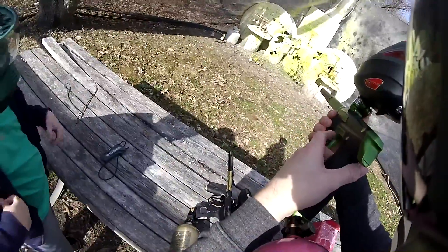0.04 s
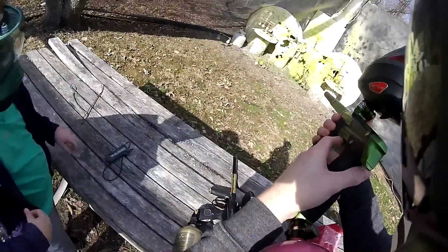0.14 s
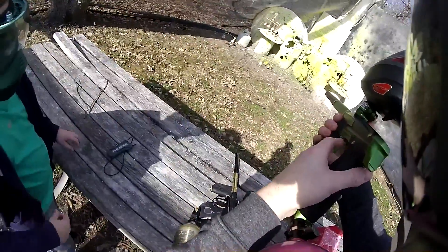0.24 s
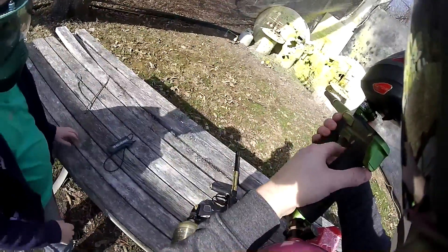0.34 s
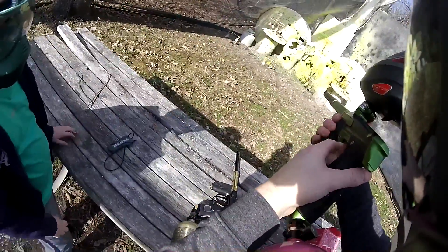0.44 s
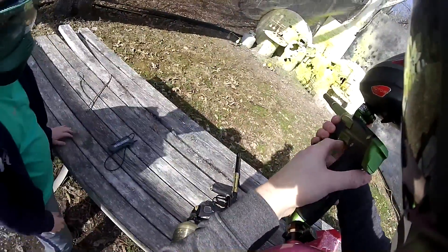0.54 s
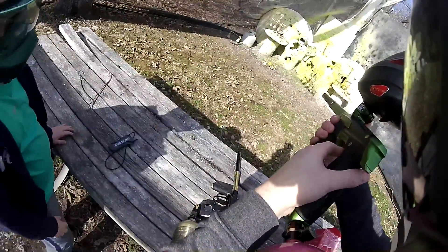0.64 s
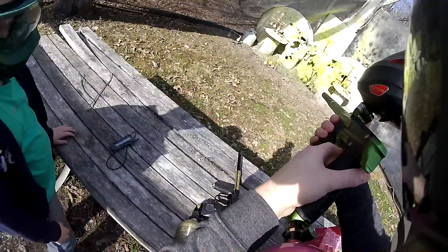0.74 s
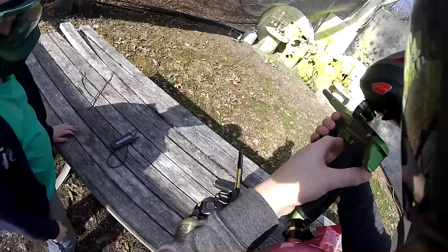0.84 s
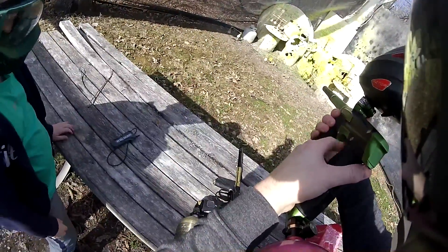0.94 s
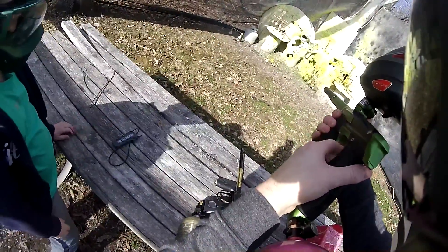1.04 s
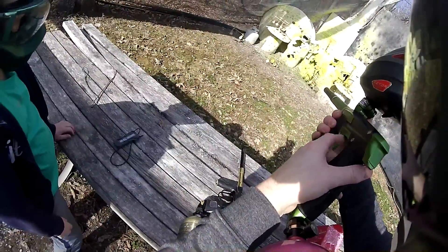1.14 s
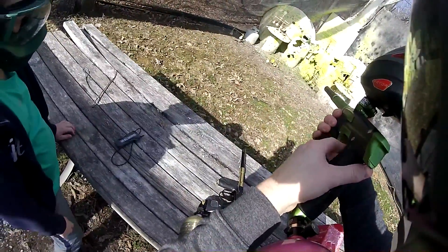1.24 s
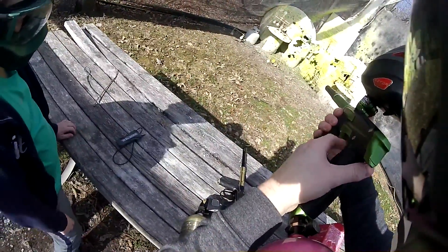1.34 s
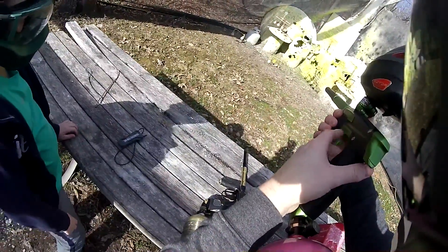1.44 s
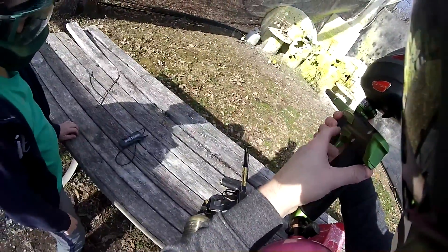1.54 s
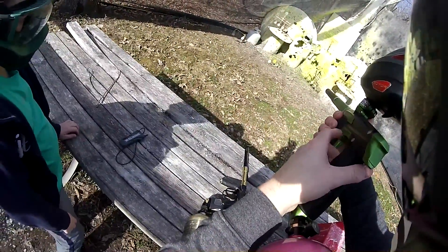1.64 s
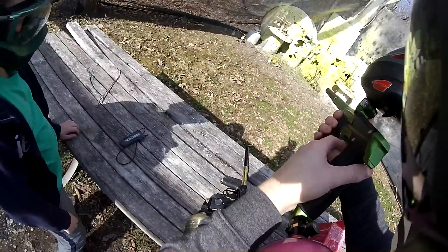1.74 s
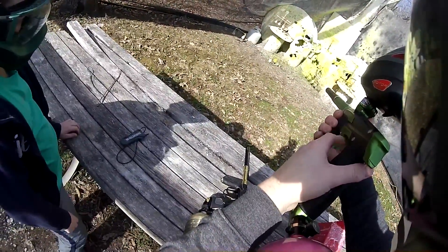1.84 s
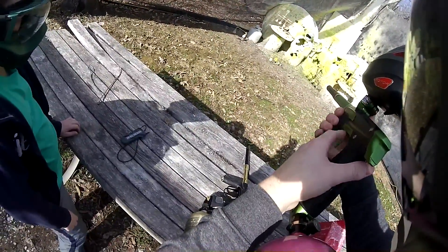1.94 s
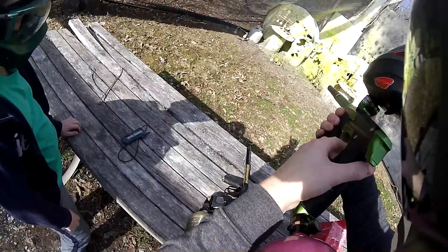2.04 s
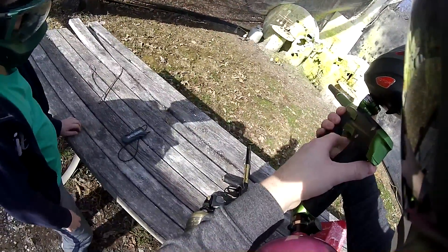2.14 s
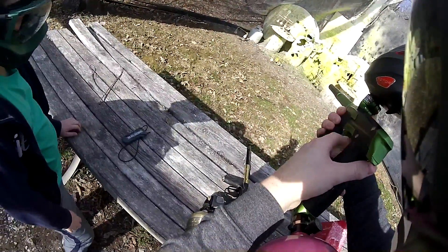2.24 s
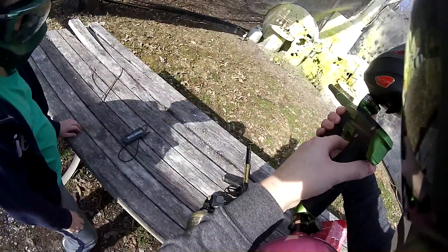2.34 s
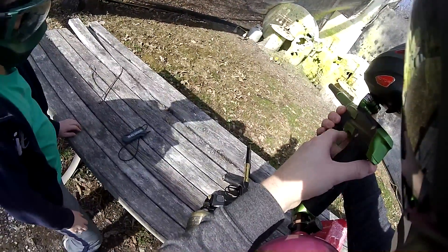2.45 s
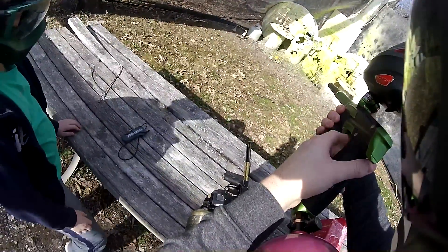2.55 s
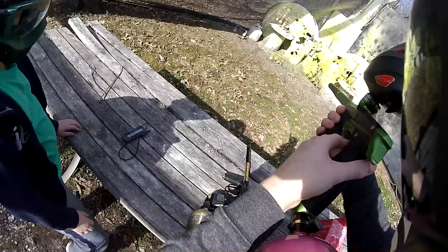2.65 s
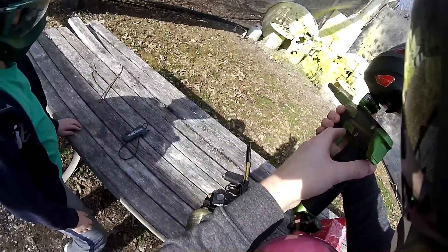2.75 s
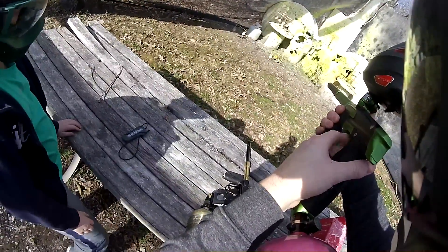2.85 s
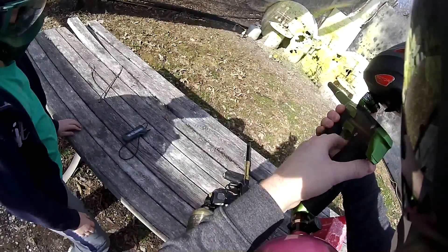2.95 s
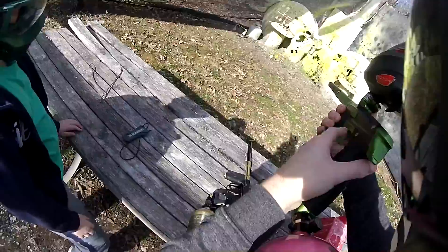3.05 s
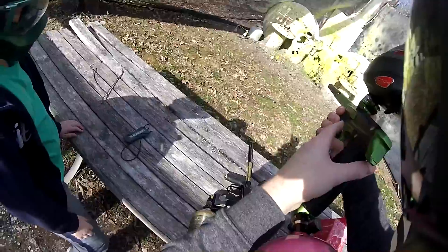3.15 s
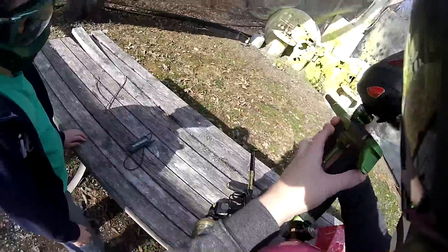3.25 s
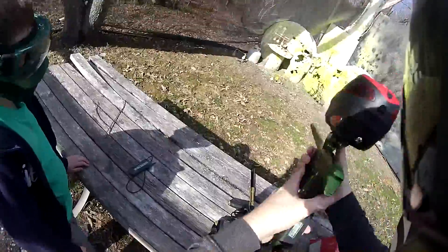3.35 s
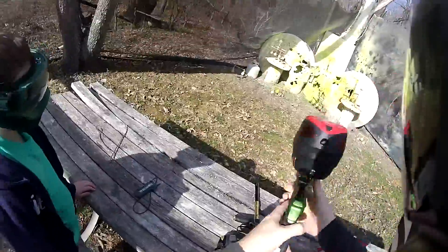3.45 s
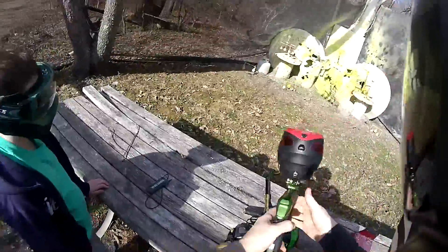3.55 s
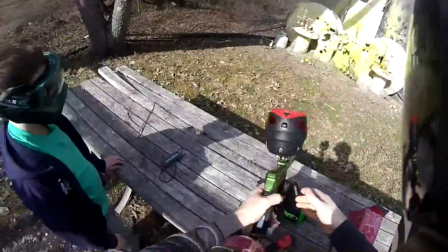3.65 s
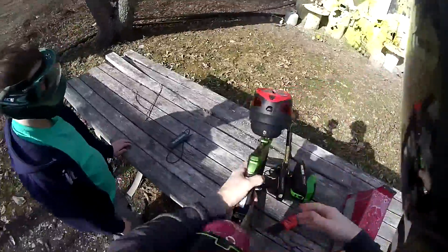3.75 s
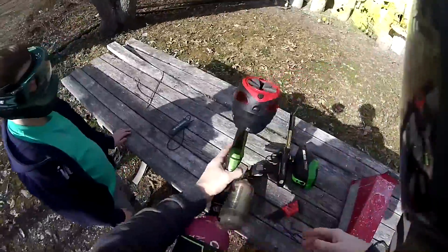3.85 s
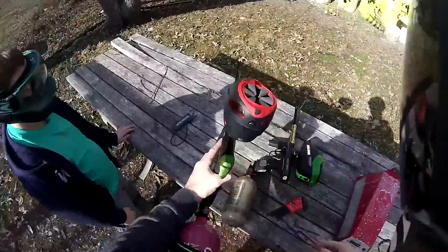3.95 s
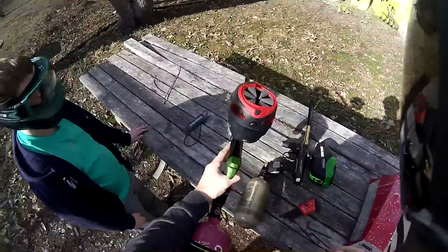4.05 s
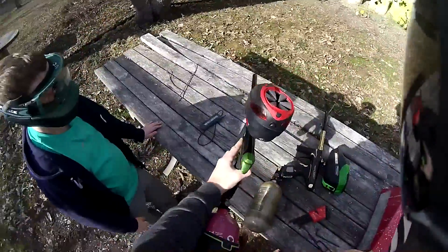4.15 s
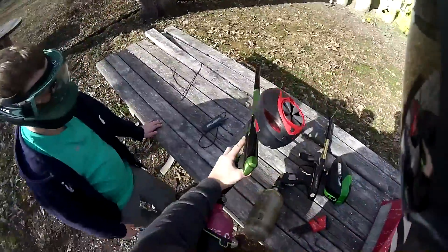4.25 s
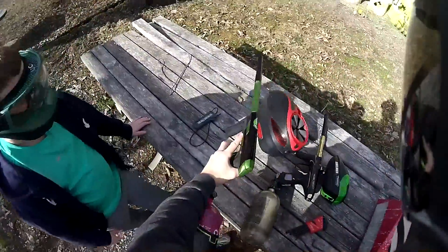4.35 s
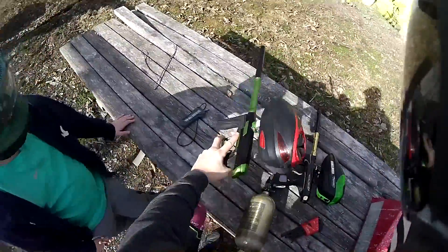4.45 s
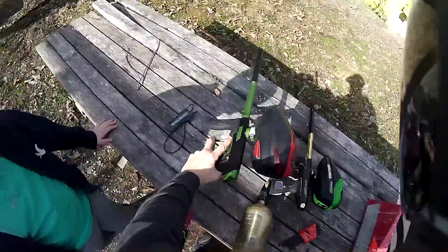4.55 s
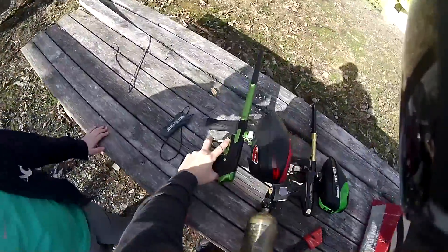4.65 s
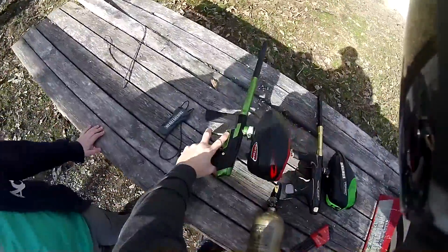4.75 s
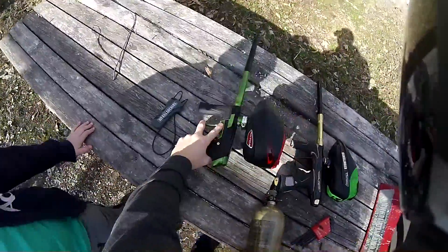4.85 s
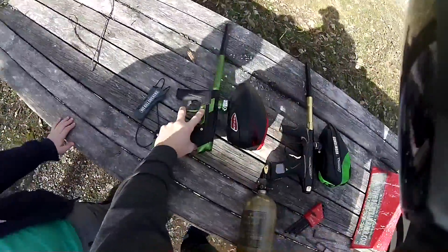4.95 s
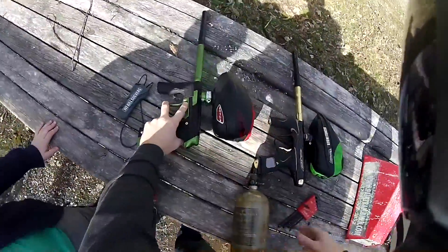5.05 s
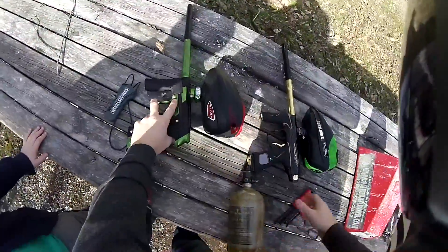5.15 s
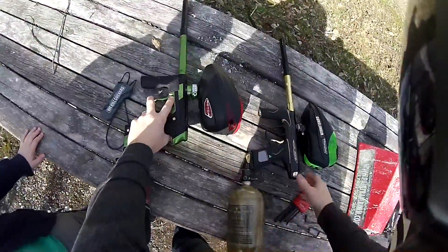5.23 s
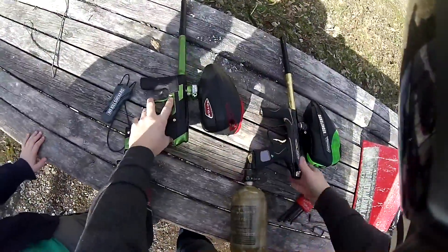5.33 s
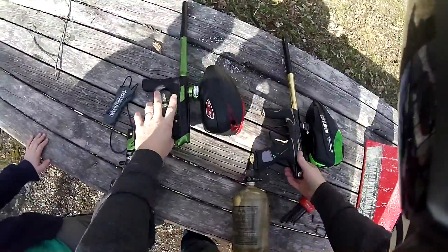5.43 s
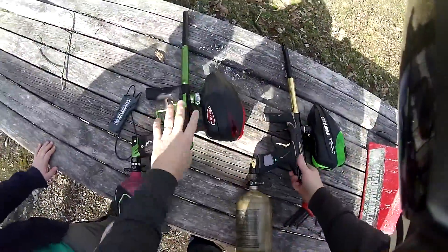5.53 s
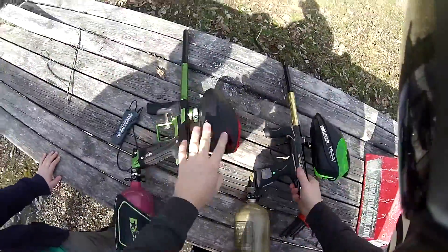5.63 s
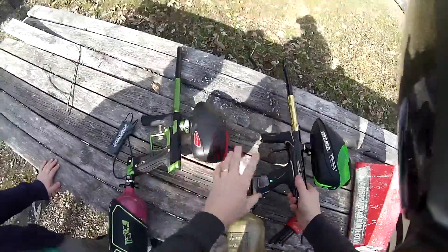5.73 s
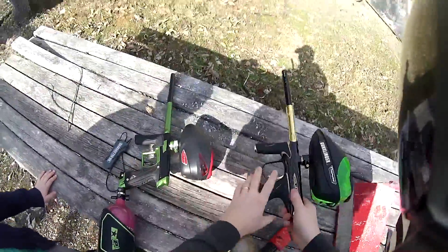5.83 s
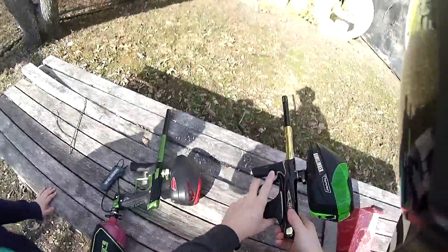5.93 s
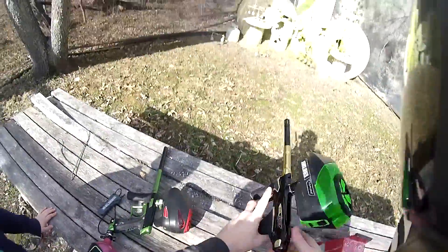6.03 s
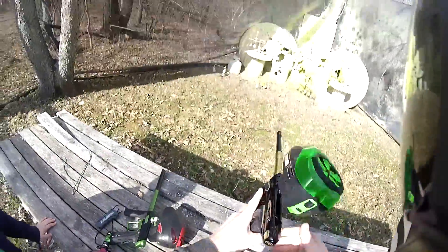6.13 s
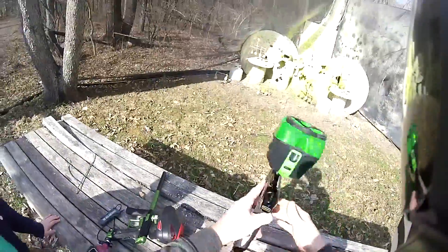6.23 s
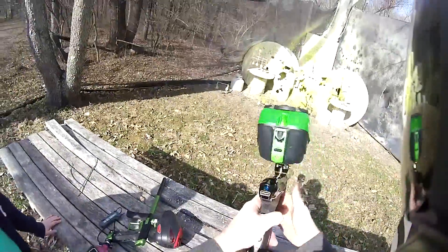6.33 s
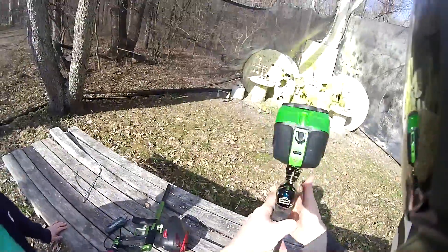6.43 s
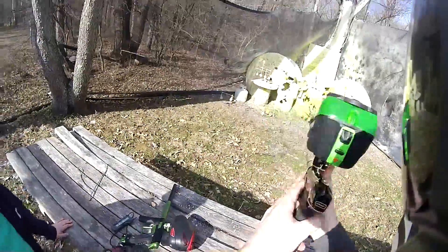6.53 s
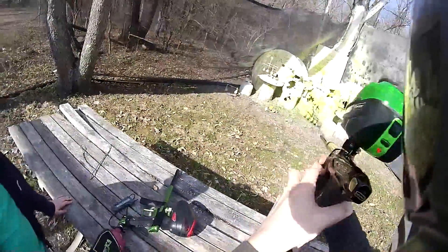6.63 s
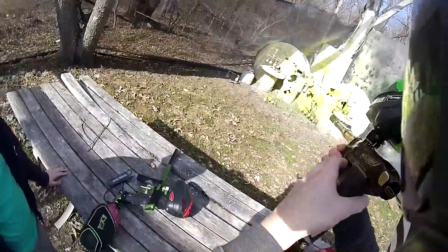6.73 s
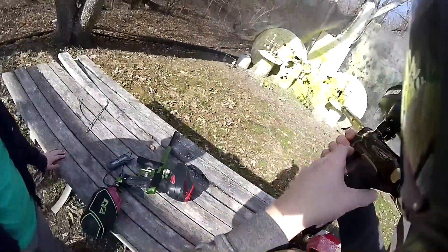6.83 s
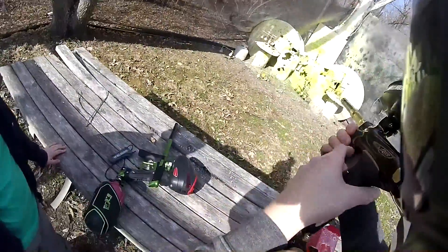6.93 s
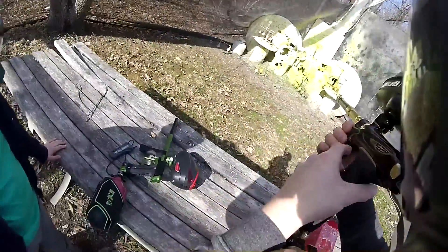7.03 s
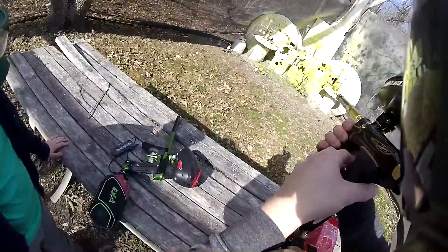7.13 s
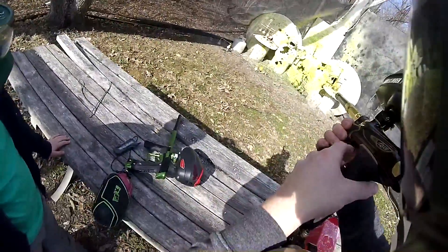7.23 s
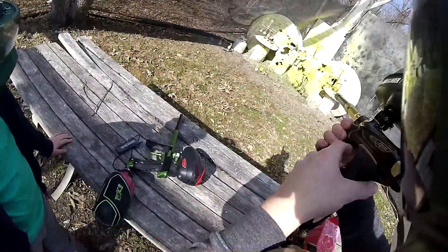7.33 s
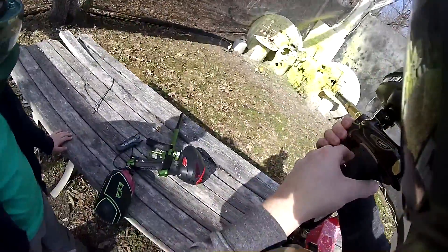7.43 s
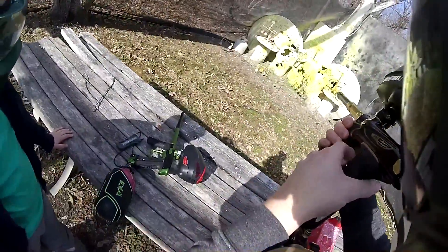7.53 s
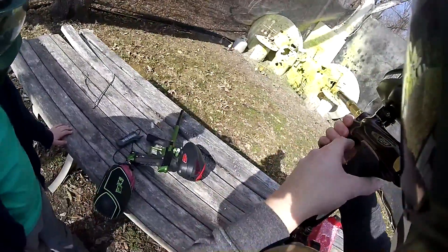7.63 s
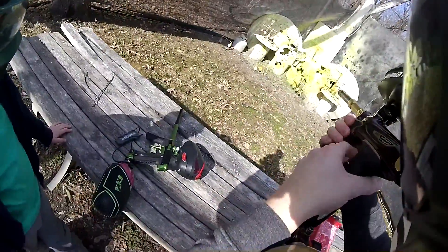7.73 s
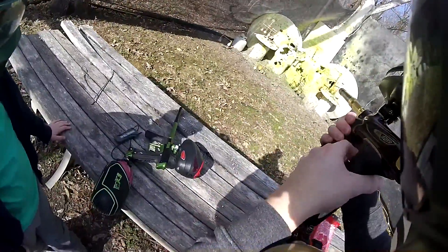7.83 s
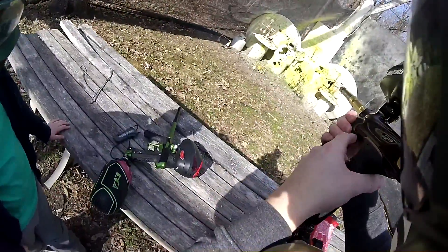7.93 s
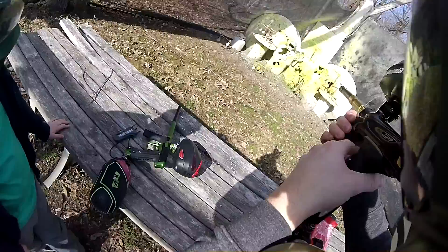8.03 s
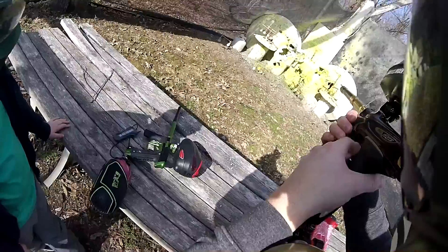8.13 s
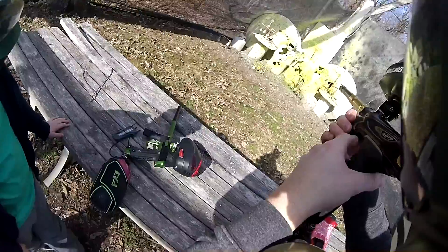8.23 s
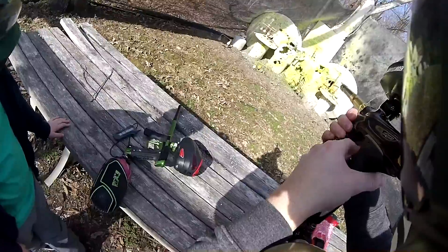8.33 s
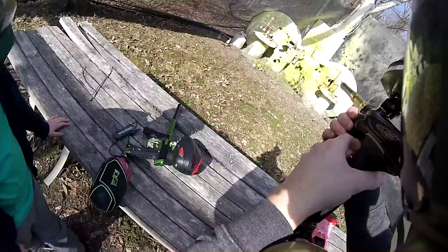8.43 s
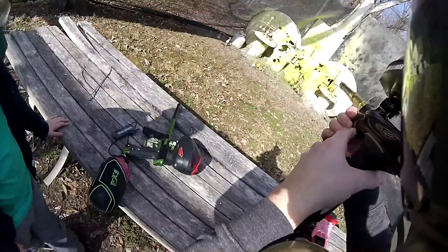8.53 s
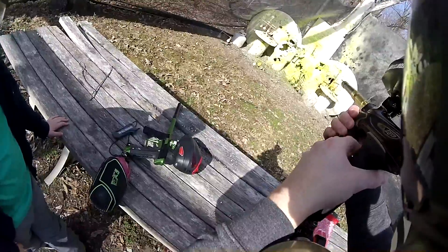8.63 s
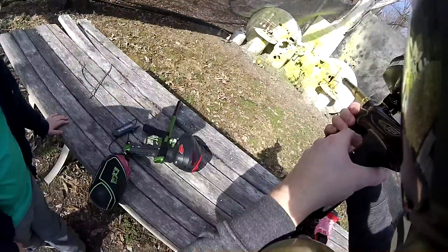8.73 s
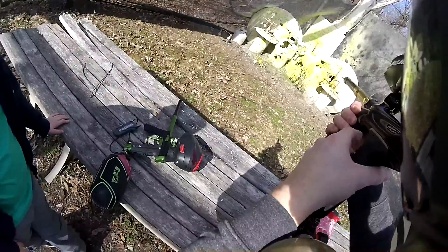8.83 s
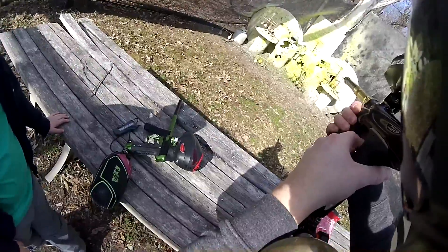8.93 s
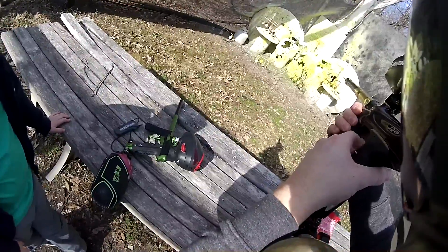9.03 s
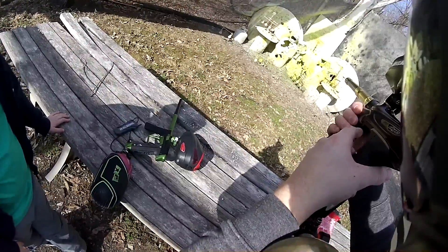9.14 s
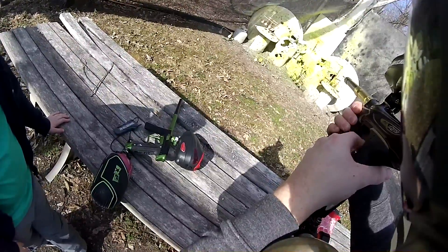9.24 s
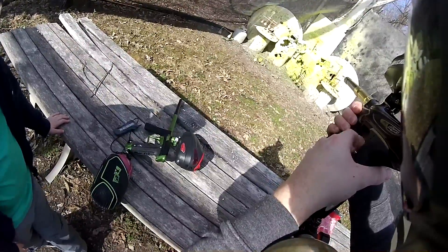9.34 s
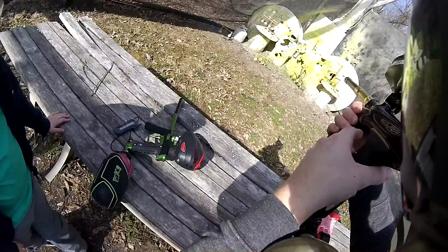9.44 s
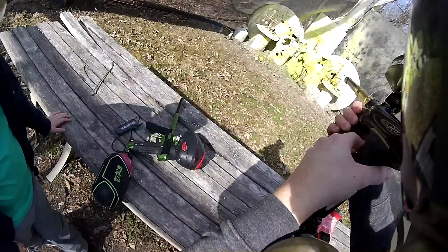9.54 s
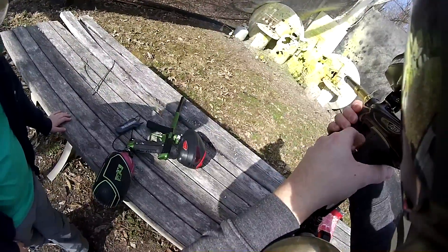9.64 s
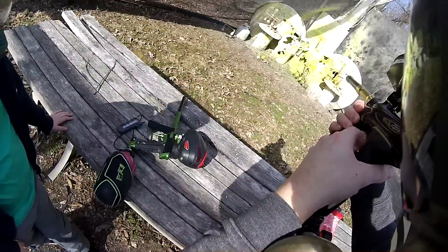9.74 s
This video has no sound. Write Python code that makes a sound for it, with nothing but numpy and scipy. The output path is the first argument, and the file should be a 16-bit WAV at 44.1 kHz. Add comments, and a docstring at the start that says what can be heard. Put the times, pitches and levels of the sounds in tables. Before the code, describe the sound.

An electronic paintball marker fires close by, soft deep pops in single shots and rapid bursts, each ball smacking a target just after. It stops, fingers tap plastic, and the marker knocks down onto a wooden table. A sleeve swishes, then a second marker fires with a hollow bark, its hits fainter. A head-worn microphone catches a quiet outdoor hush and a short echo from the trees.

```python
"""A plank table at the edge of a wood, heard from a head-worn camera that ticks faintly in the outdoor hush.
An electronic paintball marker fires singly and at twelve shots a second: solenoid click, bolt sliding
forward, air blast, bolt return. Downrange, each ball hits the targets about 70 ms later.
From 4 s fingers tap plastic, the marker is laid on the planks and another comes up with a swish of sleeve.
From 7 s that one fires, its balls landing 80-120 ms later. Ground and trees throw back shots and knocks."""
import sys
import numpy as np
from scipy import signal
from scipy.fft import rfft, irfft
from scipy.io import wavfile

SR = 44100
rng = np.random.default_rng(int(sys.argv[2]) if len(sys.argv) > 2 else 0)


def dump_mix(stems):
    """Bounce the given channels to the path in sys.argv[1] as a 16-bit WAV at rate SR."""
    frames = np.atleast_2d(stems).T  # one column per channel
    limited = np.clip(frames, -1, 1)  # hard clip at full scale
    pcm = np.round(limited * 32767).astype(np.int16)
    wavfile.write(sys.argv[1], SR, pcm)


N = 431298
T = np.arange(SR // 3) / SR  # time within one short sound
FIRST_CYCLE_S, SECOND_CYCLE_S = .0817, .08  # between shots at full rate

# first marker's bursts, each aimed at one spot: t/s, shots, flight/s, splat/dB, thud/dB, panel pitch ratio
FIRST_BURSTS = [(.3551, 1, 0.069, 4.5, -4, 0.99), (.4556, 1, 0.071, 5.5, 0, 1.065),
                (.6294, 1, .0696, 1.5, 1.5, 1.02), (.8688, 7, .073, -1, -20.5, 1),
                (1.917, 1, 0.069, -3, -17, 1.1), (2.0568, 10, .071, -2.5, -15, 1),
                (2.91, 2, 0.073, 1, -16, 0.91), (3.0761, 1, 0.074, -0.5, -23, 1.1)]
# second marker's bursts: t/s, shots, flight/s, splat/dB, thud/dB, muzzle crack/dB
SECOND_BURSTS = [(7.135, 1, 0.078, -3, -13.5, -1), (7.4261, 1, 0.083, 0.5, -36, 1.5),
                 (7.5715, 1, 0.083, -9.5, -18.5, 1), (7.7183, 1, 0.085, 0, -29, 4.5),
                 (7.8734, 5, 0.095, -6.5, -22, 0.7), (8.3131, 1, 0.11, -13, -32, 1.5),
                 (8.3961, 2, 0.098, -8, -34, 2.5), (8.6134, 1, 0.12, -11, -28, 3),
                 (8.701, 4, 0.12, -16, -34, 0.9), (9.0674, 1, 0.093, -7, -26, -7),
                 (9.1531, 2, .11, -10, -32, 0), (9.3163, 1, 0.11, -8, -27, -4),
                 (9.398, 5, .102, -6, -34, 1.7)]
# spectrum of a hard, sharp click: f/Hz, level/dB
CLICK = [(1500, 7.5), (3000, 5.5), (4000, -4), (5000, -10.5), (6500, -11.5), (8800, -17), (13000, -42)]
# spectrum of a sliding bolt or spraying paint: f/Hz, level/dB
RASP = [(300, 3), (1400, 13.5), (2800, -14.5), (3600, -15), (4600, -17), (6500, -23), (8800, -26),
        (13000, -81)]


def amp(db):
    """Decibels to gain."""
    return 10 ** (np.asarray(db) / 20)


def add(track, s, sound):
    """Mix a sound into a track at s seconds."""
    at = max(0, int(round(s * SR)))
    part = sound[:max(0, len(track) - at)]
    track[at:at + len(part)] += part


def cut(x, hz, kind, order):
    """Butterworth low-pass or high-pass."""
    return signal.sosfilt(signal.butter(order, hz, kind, fs=SR, output="sos"), x + 1e-18)


def noise(spectrum, size):
    """Noise of rms 1; the spectrum gives only its shape."""
    hz, db = np.transpose(spectrum)
    bin_hz = np.fft.rfftfreq(size, 1 / SR) + 1
    bass_rolloff = np.minimum(bin_hz / hz[0], 1) ** 2
    shape = bass_rolloff * amp(np.interp(np.log(bin_hz), np.log(hz), db))
    x = irfft(rfft(rng.standard_normal(size)) * shape, size)
    return x / x.std()


def fade(t60, rise):
    """A quick swell and an exponential decay, both in seconds."""
    return (1 - np.exp(-T / rise)) * np.exp(-np.log(1000) * T / t60)


def ring(modes, spread_db=.8, detune=.012, rise=.00005, alternate=False):
    """A struck body, each blow a little different; alternate starts neighbouring modes in opposition."""
    out = np.zeros(len(T))
    for k, (hz, db, t60) in enumerate(modes):
        strength, pitch = rng.standard_normal(2)
        sign = (-1) ** k if alternate else 1
        tone = np.sin(2 * np.pi * hz * (1 + detune * pitch) * T)
        out += sign * amp(db + spread_db * strength) * tone * fade(t60, rise)
    return out


def puff(spectrum, db, t60, rise):
    """A short burst of noise: escaping air, sliding or spray."""
    return amp(db) * noise(spectrum, size=len(T)) * fade(t60, rise)


def shots(bursts, cycle_s):
    """One row per shot: a burst repeats at the marker's cycle time."""
    return np.array([(start + k * cycle_s, *aim) for start, count, *aim in bursts for k in range(count)])


def camera(ticks_per_s=20.104, whine_hz=9625, whine_db=-91.5):
    """Right at the microphone, the camera's low regular ticking and thin whine."""
    # modes of the tick: f/Hz, level/dB, t60/s
    tick_modes = [(40, -67, 1), (101, -59.5, 0.21), (116, -47.5, 0.026), (367, -68, 0.17),
                  (417.5, -68, 0.45)]
    tick = ring(tick_modes, spread_db=0, detune=0)
    ticks = np.zeros(N)
    for s in np.arange(.0232, N / SR, 1 / ticks_per_s):
        add(ticks, s, -tick)
    whine = amp(whine_db) * np.sqrt(2) * np.sin(2 * np.pi * whine_hz * np.arange(N) / SR)
    return ticks + whine


def hush():
    """Steady outdoor air, far off."""
    # spectrum of the hush: f/Hz, level/dB
    air = [(88, -27), (150, -1), (171, -11), (206, -4), (253, -16.5), (335, -2.5), (495, -15), (1150, -5),
           (1490, -10.5), (1640, -10.5), (2330, -12.5), (3330, -27), (10000, -32), (13000, -33.5)]
    return amp(-60) * noise(air, size=N)


def first_marker():
    """Close by, a soft, deep pop with a whistling valve and a loud bolt return; gives (ringing, hiss)."""
    # modes of solenoid, barrel and body: f/Hz, level/dB, t60/s
    solenoid = [(970, -11, 0.007), (1046, -19.5, 0.011), (1516, -25, 0.01)]
    barrel = [(129, -31.5, 0.054), (217, -26, 0.045), (330, -21.5, 0.02), (447, -35.5, 0.014),
              (1350, -31, 0.0035)]
    body = [(250, -34.5, 0.014), (408, -26.5, 0.047), (543, -33, 0.081), (1047, -24, 0.025),
            (1190, -40.5, 0.23), (1403, -31.5, 0.032), (2175, -46.5, 0.075), (2570, -30, 0.0087)]
    # spectrum of air leaving the valve: f/Hz, level/dB
    valve = [(1500, 12.5), (3300, 0), (4500, -18), (6300, -5), (7500, -17.5), (8600, 3.5), (9600, -20),
             (13000, -30)]
    # the bolt's contacts: t/s from the blast, level/dB
    bolt_stops = [(-.005, -5), (-.0033, -7.5), (0.0199, -4.5), (0.0244, 0.5), (.0274, -6)]
    ringing, hiss = np.zeros((2, N))
    for s in shots(FIRST_BURSTS, FIRST_CYCLE_S)[:, 0]:
        blast_db, valve_db = rng.normal([.5, -24.5], .6)  # air pressure varies from shot to shot
        add(ringing, s - .0238, ring(solenoid, rise=.0017, alternate=True))
        add(hiss, s - .0052, puff(RASP, db=-23.5, t60=.034, rise=.0011))  # the bolt slides forward
        add(ringing, s, amp(blast_db) * ring(barrel))
        add(hiss, s + .00019, puff(valve, db=valve_db, t60=.012, rise=.0002))
        for delay, db in bolt_stops:
            add(ringing, s + delay + rng.normal(0, .00016), amp(db) * ring(body, alternate=True))
            add(hiss, s + delay, amp(db) * puff(CLICK, db=-38, t60=.03, rise=.0001))
    return ringing, hiss


def targets():
    """Downrange, each shell cracks and sprays, and a square hit rings the panel; gives (ringing, hiss)."""
    # modes of the target panel and the ball's shell: f/Hz, level/dB, t60/s
    panel = [(283, -20, 0.081), (354, -9, 0.02), (480, -19.5, 0.036), (544, -41.5, 0.53),
             (593, -25.5, 0.047), (1116, -16.5, 0.019), (1400, -8, 0.015), (2043, -22, 0.027)]
    shell = [(1076, -30.5, 0.009), (1520, -39, 0.018), (2065, -30.5, 0.018), (2570, -29, 0.011),
             (3280, -32.5, .008), (3800, -34, 0.017)]
    ringing, hiss = np.zeros((2, N))
    balls = list(shots(FIRST_BURSTS, FIRST_CYCLE_S))
    balls += [(*ball, 1) for *ball, _ in shots(SECOND_BURSTS, SECOND_CYCLE_S)]  # panel pitch ratio 1
    for fired, flight_s, splat_db, thud_db, pitch in balls:
        s = fired + rng.normal(flight_s, .001)
        splat = amp(rng.normal(splat_db, 1.5))
        struck_spot = [(hz * pitch, db, t60) for hz, db, t60 in panel]
        add(ringing, s, -amp(thud_db) * ring(struck_spot, spread_db=3, detune=.017, rise=.0019))
        add(ringing, s, -splat * ring(shell, spread_db=3, detune=.11, alternate=True))
        crack = puff(CLICK, db=-28.5, t60=.0061, rise=.00005)
        spray = puff(RASP, db=-23, t60=.025, rise=.0015)
        add(hiss, s, splat * (crack + spray))
    return ringing, hiss


def plastic_tick():
    """A small click of the hopper's plastic."""
    # modes of the hopper: f/Hz, level/dB, t60/s
    hopper = [(1140, -41.5, 0.024), (1500, -27, 0.011), (2170, -42, 0.014), (3230, -49, 0.011)]
    tick = ring(hopper, spread_db=4, detune=.083, rise=.00032, alternate=True)
    return tick + puff(CLICK, db=-45, t60=.0043, rise=.00024)


def handling(rebound_s=.056, rebound_db=-9):
    """At arm's length, fingers tap plastic, the air tank drags and the marker knocks on the table."""
    # fingers on the plastic: t/s, level/dB
    taps = [(4.058, 2.5), (4.18, -1.5), (4.412, -7)]
    # spectrum of the tank rumbling over the planks: f/Hz, level/dB
    drag = [(60, -5), (160, -2), (300, -11), (600, -16), (1500, -15), (4000, -47)]
    # the marker set down: t/s, wooden knock/dB, plastic tick/dB
    knocks = [(4.845, -1.5, -13.5), (5.009, 7.5, -5.5), (5.233, 4.5, -14)]
    out = np.zeros(N)
    add(out, 4.822, puff(drag, db=-44, t60=.34, rise=.011))
    contacts = [(s, amp(db) * plastic_tick()) for s, db in taps]
    for s, knock_db, tick_db in knocks:
        contacts.append((s, amp(knock_db) * plank_knock() + amp(tick_db) * plastic_tick()))
    for s, sound in contacts:
        add(out, s, sound)
        add(out, s + rng.normal(rebound_s, .0034), amp(rebound_db) * sound)  # each rocks back once
    return out


def plank_knock():
    """A knock that scuffs across the planks."""
    # modes of the table: f/Hz, level/dB, t60/s
    planks = [(151, -58, 0.03), (340, -69, 0.02), (420, -58, 0.032), (542, -42, 0.04), (736, -45, 0.019),
              (1096, -72, 0.013)]
    # spectrum of the scuff: f/Hz, level/dB
    scuff = [(60, 21), (150, -30), (300, 8), (600, 7.5), (1000, -1), (1800, -6.5), (3200, -13), (5000, -40)]
    knock = ring(planks, spread_db=2.5, detune=.06, rise=.0003)
    return knock + puff(scuff, db=-45.5, t60=.13, rise=.0014)


def sleeve(peak_s=6.48, peak_db=-40.5, rise_db_per_s=85, fall_db_per_s=70, catch_hz=70, catch_db=3):
    """Near the microphone, cloth slides in uneven catches, swelling with the arm's swing and snagging."""
    # spectrum of rubbing cloth: f/Hz, level/dB
    cloth = [(160, -63), (280, -31), (379, -18.5), (549, -0.5), (769, -9), (1070, -1), (1340, -9),
             (1460, -12), (2930, -23.5), (4500, -48), (5850, -74), (9900, -120)]
    # the cloth snags and lets go: t/s, level/dB
    snags = [(6.38, -35.5), (6.433, -40), (6.46, -29), (6.487, -37.5), (6.788, -53)]
    since_peak = np.arange(N) / SR - peak_s
    level = amp(peak_db + np.minimum(rise_db_per_s * since_peak, -fall_db_per_s * since_peak))
    for s, db in snags:
        add(level, s, amp(db) * fade(t60=.084, rise=.002))
    catches = cut(rng.standard_normal(N), catch_hz, "low", order=2)
    grain = noise(cloth, size=N) * amp(catch_db * catches / catches.std())
    return grain / grain.std() * level


def second_marker():
    """Close by, a hollow bark: the muzzle cracks, the barrel rings, air follows; gives (ringing, hiss)."""
    # modes of solenoid, barrel, muzzle and body: f/Hz, level/dB, t60/s
    solenoid = [(624, -31, 0.0079), (1220, -18.5, 0.0035), (1520, -23, 0.007)]
    barrel = [(130.6, -28, 0.044), (204, -27, 0.057), (329.5, -19.5, 0.038), (515.5, -8, 0.025),
              (670, -13.5, 0.0047), (793, -7.5, 0.0092)]
    muzzle = [(720, -23.5, 0.00067), (1124, -5, 0.0038), (2000, -13, 0.0039), (2690, -46, 0.0058)]
    body = [(428, -30, 0.019), (1005, -35, 0.049), (1057, -40.5, 0.051), (1150, -54, 0.9),
            (1360, -33.5, 0.0052), (2140, -48, 0.0089), (2670, -60, .012)]
    # spectra of the sliding bolt and of air leaving the valve: f/Hz, level/dB
    slide = [(700, 7), (1300, 4), (2000, -1), (2700, 10), (3400, -16.5), (4500, -20), (12000, -44)]
    valve = [(1500, 11.5), (3000, -2), (4000, -11.5), (5400, -13.5), (6400, 0), (7600, -16), (8600, -16.5),
             (10500, -20), (13000, -60)]
    # the bolt's contacts: t/s from the blast, level/dB
    bolt_stops = [(-.0075, -2), (-.005, 3.5), (0.018, -17), (0.0214, -1.5), (.0275, 0.5), (.031, -17)]
    ringing, hiss = np.zeros((2, N))
    fired = shots(SECOND_BURSTS, SECOND_CYCLE_S)
    rests = np.diff(fired[:, 0], prepend=0)
    for (s, *_, muzzle_db), rest in zip(fired, rests):
        blast_db, crack_db = rng.normal([0, muzzle_db], [.6, 1])
        stuck = 1 - np.exp(-rest / .5)  # after a rest the bolt's seals stick, so the blast lags the click
        click_s = s - .015 - .00513 * stuck
        add(ringing, click_s, amp(4.5 + .99 * stuck) * ring(solenoid, rise=.0001, alternate=True))
        add(hiss, click_s, puff(CLICK, db=-44, t60=.0076, rise=.0003))
        add(hiss, s - .011, puff(slide, db=-25, t60=.033, rise=.01))
        add(ringing, s - .0008, -amp(blast_db) * ring(barrel, rise=.00062))
        crack = amp(crack_db) * cut(ring(muzzle), 210, "high", order=1)
        add(ringing, s + .00041, amp(-1) * crack)
        add(ringing, s + .002407, amp(-13) * crack)  # the pressure wave runs down the barrel and back
        add(hiss, s + .0006, amp(crack_db) * puff(CLICK, db=-32.5, t60=.0072, rise=.0001))
        add(hiss, s + .0017, puff(valve, db=-19, t60=.014, rise=.00081))
        for delay, db in bolt_stops:
            add(ringing, s + delay + rng.normal(0, .0003), amp(db) * ring(body, alternate=True))
        add(hiss, s + .0275, puff(valve, db=-46.5, t60=.007, rise=.0002))  # the bolt seats, spitting air
    return ringing, hiss


def woods(x, near_db, near_t60, far_db, far_t60):
    """Leaves and trunks, near and far, scatter each band into a wash that follows its energy and fades."""
    # colour of the scattered sound: f/Hz, level/dB
    colour = [(100, -3), (250, -5), (500, -9), (750, -4.5), (1100, -0.5), (1700, -5), (2600, -3),
              (4000, -49), (6400, -7), (12000, -16)]
    hz, db = np.transpose(colour)
    near, far = fade(near_t60, rise=.013) ** 2, fade(far_t60, rise=.053) ** 2
    returned = amp(near_db) ** 2 * near / near.sum() + amp(far_db) ** 2 * far / far.sum()
    edges_hz = np.geomspace(80, 13000, 14)
    white, out = rng.standard_normal((2, N)), np.zeros(N)
    for k, (low, high) in enumerate(zip(edges_hz, edges_hz[1:])):
        band = signal.butter(2, [low, high], "band", fs=SR, output="sos")
        energy = signal.oaconvolve(signal.sosfilt(band, x + 1e-18) ** 2, returned)[:N]
        wash = signal.sosfilt(band, white[k % 2])
        gain = amp(np.interp(np.log(low * high) / 2, np.log(hz), db))
        out += gain * np.sqrt(np.maximum(energy, 0)) * wash / wash.std()
    return out


def scene(case_hz=3200, ground_delay_s=.0081, ground_db=-11, ground_hz=1500):
    """At head height: the camera's case dulls the knocks, the ground echoes once, the trees diffusely."""
    ringing, hiss = np.sum([first_marker(), second_marker(), targets()], axis=0)
    direct = cut(ringing + handling(), case_hz, "low", order=5) + hiss
    out = direct + sleeve() + camera() + hush()
    add(out, ground_delay_s, amp(ground_db) * cut(direct, ground_hz, "low", order=1))
    return (out + woods(direct, near_db=-11.5, near_t60=.078, far_db=-17, far_t60=.46))[None]


def record(dry, bass_hz=74, top_hz=13200):
    """The small mono microphone loses the deep bass; the top is cut steeply."""
    thin = cut(dry, bass_hz, "high", order=2)
    return signal.sosfilt(signal.ellip(10, .1, 80, top_hz, fs=SR, output="sos"), thin)


dry = scene()
out = record(dry)
dump_mix(out)
```